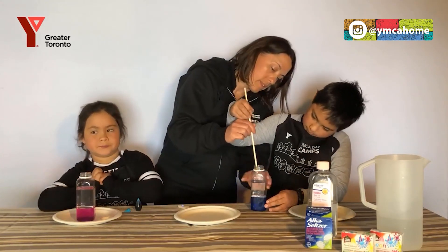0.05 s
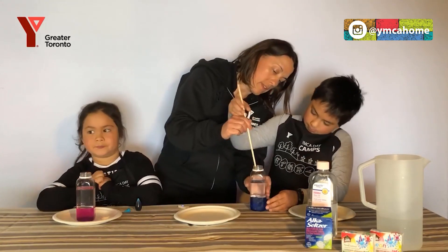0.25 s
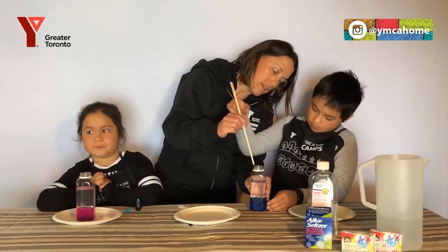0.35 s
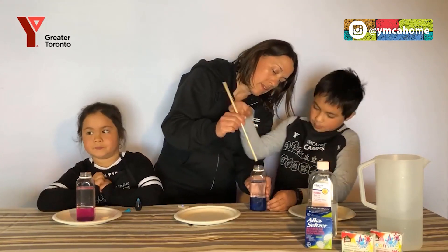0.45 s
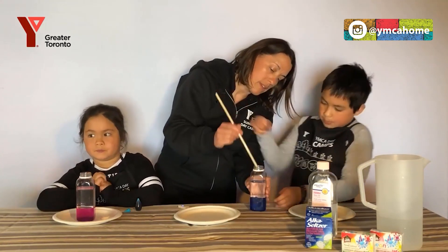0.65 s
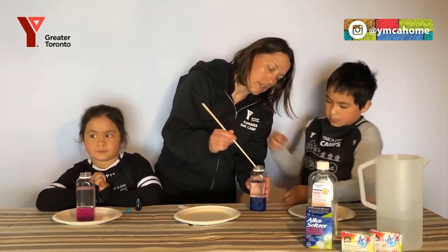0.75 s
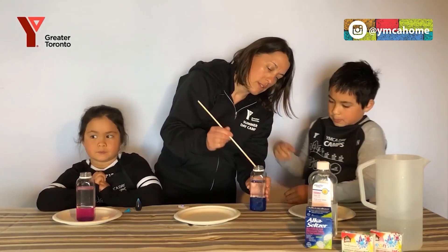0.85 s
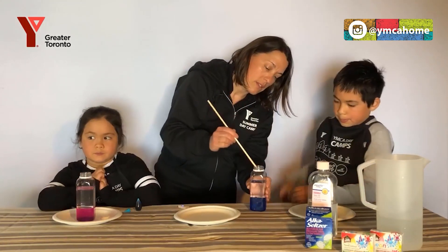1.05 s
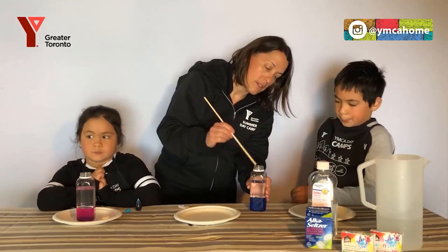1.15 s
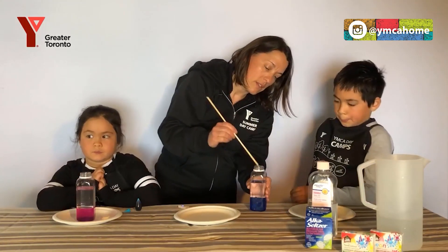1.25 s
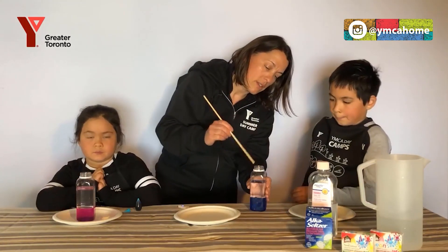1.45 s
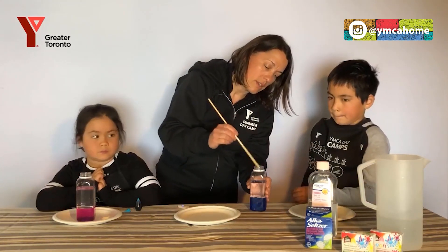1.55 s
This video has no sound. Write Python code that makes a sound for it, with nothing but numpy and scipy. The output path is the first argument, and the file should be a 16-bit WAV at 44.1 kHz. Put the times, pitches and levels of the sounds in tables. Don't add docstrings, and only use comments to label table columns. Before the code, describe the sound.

Faint clacks of a wooden stick against a plastic bottle, with soft table bumps and rustling sleeves

```python
import sys
import numpy as np
from scipy import signal
from scipy.io import wavfile

SR = 44100
rng = np.random.default_rng(int(sys.argv[2]) if len(sys.argv) > 2 else 0)


def master_out(mix):
    frames = np.transpose(np.atleast_2d(mix))
    ceiling = np.clip(frames, -1, 1)
    pcm = np.round(ceiling * 32767).astype(np.int16)
    wavfile.write(sys.argv[1], SR, pcm)


def gain_from_decibels(decibels):
    exponent = np.asarray(decibels, float) / 20
    return 10 ** exponent


N = 70560


def rms_one(x):
    return x / np.sqrt(np.mean(x ** 2) + 1e-20)


def drift(rate_hz):
    r = np.exp(-80 * np.pi * rate_hz / SR)
    slow = signal.lfilter([1], [1, -2 * r, r * r], rng.standard_normal(N // 40 + 2002))
    slow = slow[2000:]
    return np.interp(np.arange(N) / 40, np.arange(len(slow)), rms_one(slow))


def keep_band(noise, edges_hz):
    return signal.sosfilt(signal.butter(2, edges_hz, "band", fs=SR, output="sos"), noise)


def banded(white, spectrum, tilt_db, patchy_db):
    out, together = 0, drift(6)
    edges = 22 * 2 ** np.arange(0, 9.9, 0.5)
    hz, db = np.transpose(spectrum)
    for k, (low, high) in enumerate(zip(edges, edges[1:])):
        run_in = np.tile(white[k % 2], 2)[N // 2:]
        band = keep_band(run_in, [low, high])[-N:]
        mid = np.sqrt(low * high)
        level = np.interp(np.log(mid), np.log(hz), db) + tilt_db * np.log2(mid / 2000)
        flicker = patchy_db * (0.5 * together + drift(49))
        out = out + band * gain_from_decibels(level + flicker)
    return out


# (frequency [Hz], level [dB])
AIR = [(15, -49), (25, 3), (293, -4), (354, -5), (695, -4), (887, -9), (1230, -12), (8360, -21),
       (16000, -24.5)]


def room_air():
    level_db = -60.5
    return gain_from_decibels(level_db) * rms_one(banded(rng.standard_normal((2, N)), AIR, 0, 0.69))


# (time [s], level [dB], brightness [dB per octave])
RUSTLE = [(0, -77, 3), (.2, -87, -3), (0.239, -58, 2), (.37, -59, 3.5), (.41, -59, 3), (0.442, -70.5, -0.5),
          (.485, -65, 2), (.52, -56.5, 0.2), (.6, -54.5, 2.5), (.72, -57.5, 1), (.77, -55.5, 2.5),
          (.83, -55.5, 1.5), (.95, -53.5, 3), (1.022, -59.5, 2.5), (1.1, -54.5, 3), (1.202, -61.5, 1.5),
          (1.265, -57, 1.5), (1.298, -52.5, 0), (1.392, -63, 0.5), (1.6, -59, 2.5)]
# (frequency [Hz], level [dB per Hz])
CLOTH = [(150, 10.5), (400, 4.5), (1000, -0.5), (2500, -6), (4000, -10), (8000, -17.5), (14000, -23.5),
         (16000, -27)]


def sleeves():
    fibres_per_s, fibre_share, patchy_db = 4000, 0.38, 1.5
    s, db, tilt = np.transpose(RUSTLE)
    t = np.arange(N) / SR
    ticks = (rng.random((2, N)) < fibres_per_s / SR) * rng.standard_normal((2, N))
    ticks *= gain_from_decibels(2.5 * np.minimum(rng.exponential(1, (2, N)), 3))
    hiss = rng.standard_normal((2, N))
    white = np.sqrt(1 - fibre_share) * hiss + np.sqrt(fibre_share) * rms_one(ticks)
    loudness = gain_from_decibels(np.interp(t, s, db) + 10)
    return loudness * banded(white, CLOTH, np.interp(t, s, tilt), patchy_db)


# (time [s], rms level [dB], centre frequency [Hz], swell [s], fade [s])
KNOCKS = [(0.2215, -50, 900, 0.0011, 0.0073), (.232, -59, 690, 0.0037, 0.019),
          (0.4765, -47.5, 4500, 0.0003, 0.0039), (0.4769, -47, 1450, 0.0006, 0.0079),
          (0.4773, -50, 11000, 0.00034, 0.0044), (0.504, -55, 1070, 0.0072, 0.0027),
          (.525, -55, 900, 0.0039, 0.026), (0.732, -57.5, 9000, 0.039, 0.013),
          (0.881, -65.5, 3970, 0.12, 0.023), (1.03, -53, 3680, 0.067, 0.04), (.26, -56, 6260, 0.13, 0.012),
          (.31, -61.5, 760, 0.039, 0.05), (0, -60.5, 7000, .002, 0.011), (1.27, -54, 5560, 0.026, 0.041),
          (1.277, -65, 12000, .02, 0.032), (1.534, -57, 1300, 0.0049, .018), (.04, -67, 790, .03, 0.031),
          (.335, -62.5, 167, 0.017, 0.038), (.507, -48, 980, 0.0084, .006)]


def knocks():
    half_width_octaves = 0.9
    out, white = np.zeros(N + SR), rng.standard_normal((len(KNOCKS), SR // 5))
    t = np.arange(SR // 5) / SR
    for (s, db, hz, swell, fade), noise in zip(KNOCKS, white):
        edges = [hz / 2 ** half_width_octaves, min(hz * 2 ** half_width_octaves, 0.45 * SR)]
        burst = rms_one(keep_band(noise, edges))
        shape = np.minimum(t / swell, np.exp((swell - t) / fade))
        start = int(s * SR)
        out[start:start + len(t)] += gain_from_decibels(db) * burst * shape
    return out[:N]


def room_echoes(x):
    t60_s, level_db, gap_s = 0.21, -5.5, 0.00081
    early_s, late_drop_db, wall_cut_hz = 0.012, -2.5, 4000
    t = np.arange(SR // 2) / SR
    dull = np.exp(-2 * np.pi * wall_cut_hz / SR)
    db = -60 * t / t60_s + late_drop_db * np.clip(4 * (t / early_s - 1), 0, 1)
    tail = signal.lfilter([1], [1, -dull], rng.standard_normal(len(t)))
    tail *= gain_from_decibels(db) * np.clip(t / gap_s - 1, 0, 1)
    return gain_from_decibels(level_db) * signal.fftconvolve(x, tail / np.sqrt(np.sum(tail ** 2)))[:N]


def pushed_modes(events):
    rise_cycles, pitch_wobble = 0.33, 0.025
    out, wobble = np.zeros(N + SR), drift(32)
    t = np.arange(SR // 4) / SR
    for s, peak_db, hz, held, t60 in events:
        start = int(s * SR)
        rise = np.sin(np.pi / 2 * np.clip(t * hz / rise_cycles, 0, 1)) ** 2
        pitch = 1 + pitch_wobble * np.resize(wobble[start:], len(t))
        phase = 2 * np.pi * hz * np.cumsum(pitch) / SR
        fading = gain_from_decibels(peak_db - 60 * np.maximum(t - held, 0) / t60)
        out[start:start + len(t)] += fading * rise * np.sin(phase)
    return out[:N]


# (time [s], peak level [dB], frequency [Hz], held [s], 60 dB fade after that [s])
BUMPS = [(.224, -40.5, 245, 0.0077, 0.01), (0.229, -46.5, 97, 0.03, 0.27), (0.244, -48, 260, 0.03, 0.046),
         (0.255, -42, 187, 0.0083, 0.084), (0.236, -42, 48.4, 0.015, 0.24),
         (0.348, -55, 250, 0.0037, 0.026), (.503, -43, 338, 0.0049, 0.014),
         (0.509, -46.5, 168.1, 0.013, 0.094), (0.516, -35, 409, 0.0043, 0.032),
         (0.521, -32.5, 152, 0.0328, 0.039), (0.546, -43, 417, 0.0041, 0.074),
         (0.564, -45, 156.4, 0.0087, 0.17), (0.558, -56, 51, 0.027, 0.17), (.70, -57.5, 201, 0.024, 0.041),
         (0.746, -53.5, 150, 0.02, 0.14), (0.783, -55.5, 95, 0.018, 0.26), (1.111, -58, 44, 0.017, 0.18),
         (1.234, -54.5, 432, 0.012, 0.14), (1.276, -38, 157, 0.011, 0.044),
         (1.286, -54.5, 475, 0.012, 0.055), (1.296, -50, 76, 0.017, 0.12),
         (1.332, -34.5, 162, 0.0035, 0.065), (1.35, -38, 99, 0.0051, 0.15),
         (1.348, -47, 366, 0.0062, 0.014)]


def table_bumps():
    return pushed_modes(BUMPS)


# (time [s], peak level [dB], frequency [Hz],
# held [s], 60 dB fade after that [s])
MORE_BUMPS = [
    (.4785, -46.5, 714, 0.008, 0.028),
    (0.48, -50.5, 903, 0.0059, 0.017),
    (.53, -50, 288, 0.027, 0.071),
    (1.324, -47, 653, 0.0069, .03),
    (1.37, -52, 180.5, 0.018, .08),
    (0.23, -51, 152, 0.017, 0.039),
    (.273, -48, 192, 0.017, .03),
    (1.3, -50.5, 300, 0.019, 0.033),
    (1.255, -55.5, 250, 0.011, .03),
    (1.115, -53.5, 150, .012, .04),
]


def more_table_bumps():
    return pushed_modes(MORE_BUMPS)


# (time [s], peak level [dB], frequency [Hz], held [s], 60 dB fade after that [s])
REBOUNDS = [(.488, -53, 2750, .002, .015), (.8035, -47, 2400, .003, .012), (.811, -52, 2650, 0.004, 0.022),
            (.821, -58, 4350, .004, .02), (.829, -50, 2450, 0.0049, .025), (1.123, -49, 1230, .008, 0.024),
            (1.128, -57, 2080, 0.0045, 0.026), (1.131, -52, 2750, .004, .03), (1.423, -44, 1232, .012, .06),
            (1.44, -57, 4400, .004, .03), (1.449, -51, 2350, 0.007, 0.022), (1.5355, -54, 4600, .0015, .01),
            (1.5357, -57, 5500, .002, .012), (1.539, -48, 655, .011, .045),
            (1.541, -55, 2745, 0.0089, 0.027), (1.543, -47, 1232, .01, .05),
            (1.556, -54, 1000, 0.0054, 0.023), (1.5675, -57, 2950, .001, .01),
            (1.5677, -52, 4600, .001, .006), (1.5685, -59, 7600, .001, .008)]


def stick_rebounds():
    return pushed_modes(REBOUNDS)


def ring(clicks, hz, t60):
    r, w = gain_from_decibels(-60 / (t60 * SR)), 2 * np.pi * hz / SR
    return signal.lfilter([0, np.sin(w)], [1, -2 * r * np.cos(w), r * r], clicks + 1e-18)


def dying_noise(clicks, edges_hz, fade_s):
    fade = signal.lfilter([1], [1, -np.exp(-1 / (fade_s * SR))], clicks)
    return fade * rms_one(keep_band(rng.standard_normal(N), edges_hz))


# (time [s], peak level [dB], brightness [dB per octave], crack level [dB], neck ring level [dB])
TAPS = [
    (0.7995, -42.5, 1, -9, -6),
    (1.1185, -44, 2.5, -11, 0),
    (1.418, -38.5, 3.5, -10, -2.5),
    (1.5342, -61.5, 5.5, 0, 5),
    (1.539, -54, -2, -14, 7),
    (1.550, -66, 5, -20, 16),
]
# (frequency [Hz], level [dB], 60 dB fade [s])
BOTTLE = [(635, -2, 0.026), (828, -0.5, 0.013), (1062, -13, 0.068), (1220, -2, 0.077), (1632, -4.5, 0.057),
          (2010, -1, 0.043), (2370, 12, 0.01), (2540, 3, 0.017), (2780, 0, 0.034), (3870, -1.5, 0.0073),
          (4430, 10.5, 0.0096), (5470, 10.5, 0.0072), (6440, 8, 0.0077), (9860, 1, 0.0093)]


def stick_taps():
    neck_low_hz, neck_high_hz = 1000, 1300
    strike_spread_db, rise_cycles = 1.2, 2.2
    s, peak_db, bright, crack_db, neck_db = np.array(TAPS).T
    at, out = (s * SR).astype(int), np.zeros(N)
    luck = rng.standard_normal((len(TAPS), len(BOTTLE)))
    for k, (hz, db, t60) in enumerate(BOTTLE):
        strike_db = peak_db + db - 14 + bright * np.log2(hz / 2000) + strike_spread_db * luck[:, k]
        strike_db = strike_db + neck_db * (neck_low_hz < hz < neck_high_hz)
        clicks = np.zeros(N)
        clicks[at] = gain_from_decibels(strike_db) * (-1) ** k
        lag = np.exp(-hz / rise_cycles / SR)
        swell = ring(clicks * (1 - lag), hz, np.log(1000) * rise_cycles / hz)
        out += ring(swell, hz, t60) * 2 / np.sin(2 * np.pi * hz / SR)
    crack, clack = np.zeros((2, N))
    crack[at] = gain_from_decibels(peak_db + crack_db)
    clack[at] = gain_from_decibels(peak_db - 7.5)
    out = out + dying_noise(crack, (2500, 13000), 0.012)
    return out + dying_noise(clack, (900, 3520), 0.022)


def scene():
    air, cloth = room_air(), sleeves()
    hits = knocks() + stick_taps()
    pushes = table_bumps() + more_table_bumps() + stick_rebounds()
    return (hits + room_echoes(hits) + pushes + cloth + air)[None]


def roll_off(x):
    return signal.sosfilt(signal.butter(12, 16400, fs=SR, output="sos"), x)


def record(dry):
    low_cut_hz, top_hz = 41.7, 16150
    dry = signal.sosfilt(signal.butter(3, low_cut_hz, "high", fs=SR, output="sos"), dry)
    dry = signal.sosfilt(signal.cheby2(16, 60, top_hz, fs=SR, output="sos"), dry)
    return roll_off(dry)


dry = scene()
out = record(dry)
master_out(out)
```